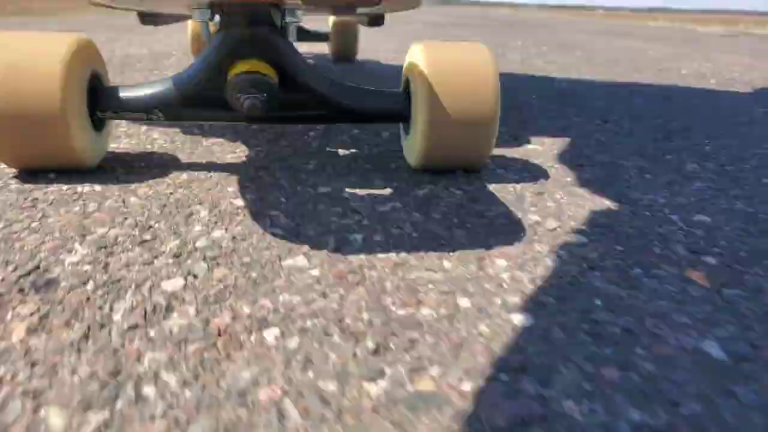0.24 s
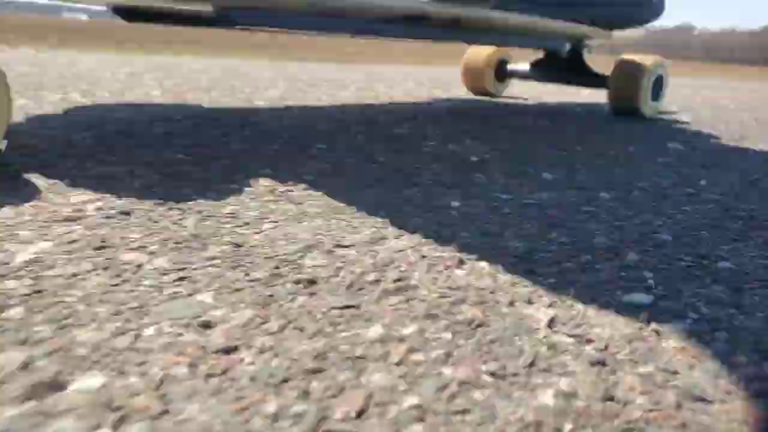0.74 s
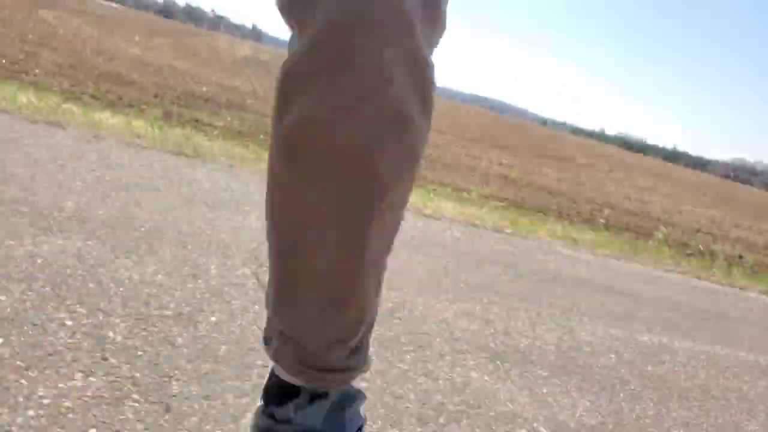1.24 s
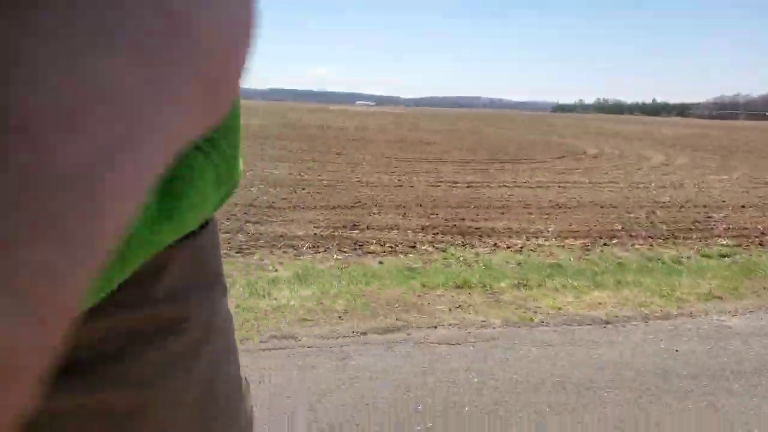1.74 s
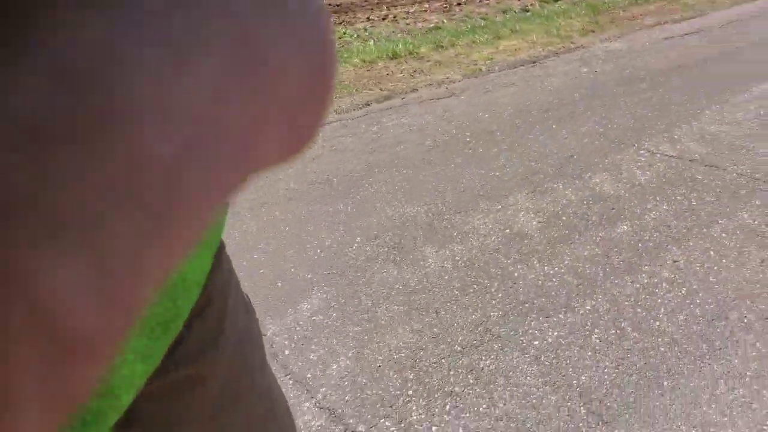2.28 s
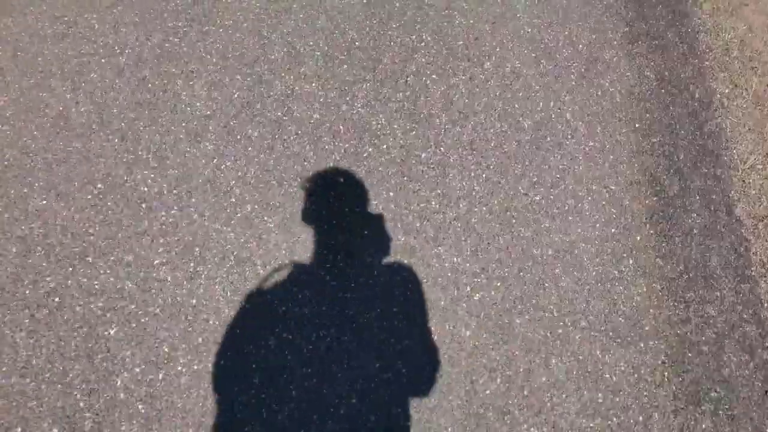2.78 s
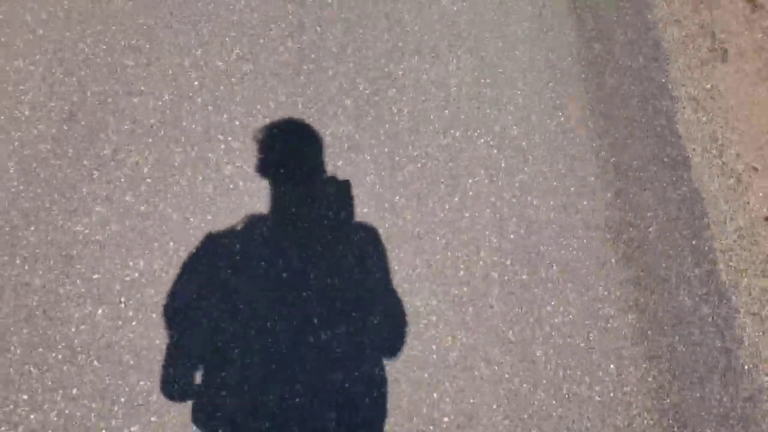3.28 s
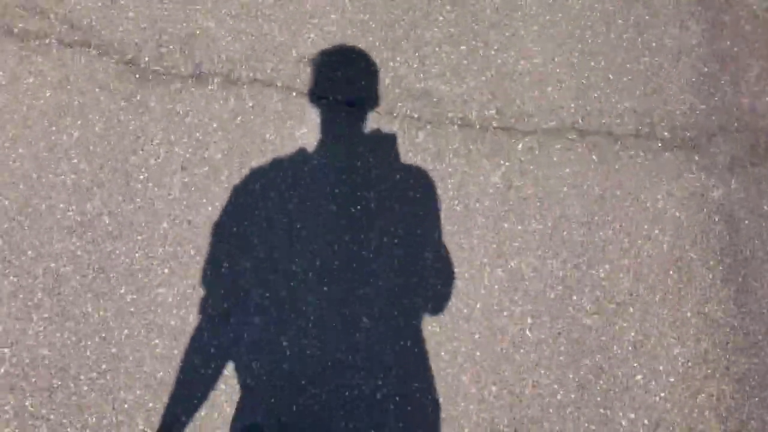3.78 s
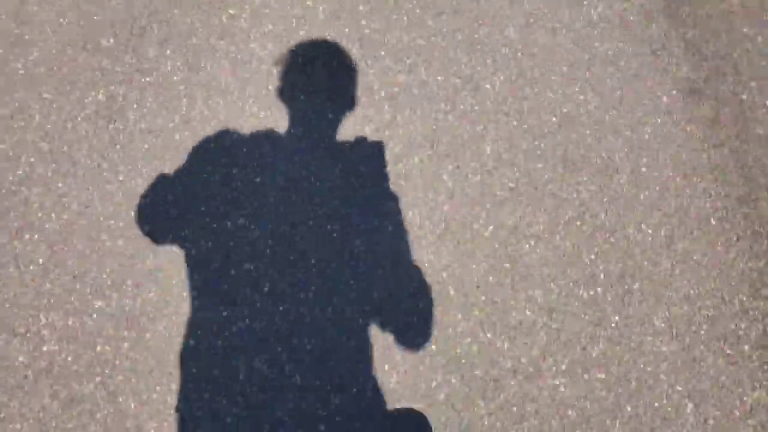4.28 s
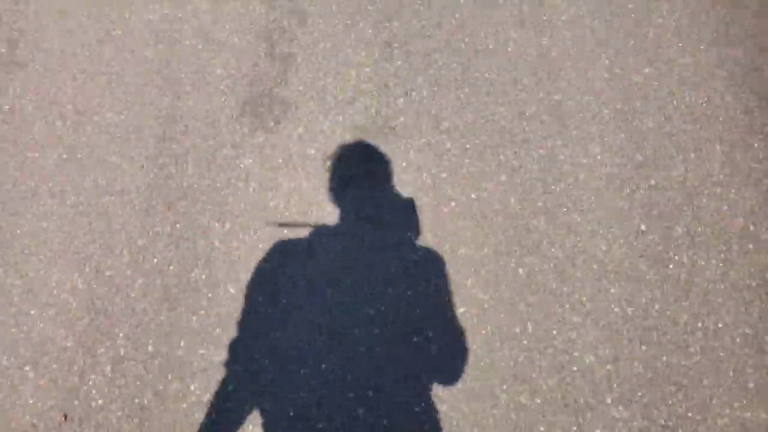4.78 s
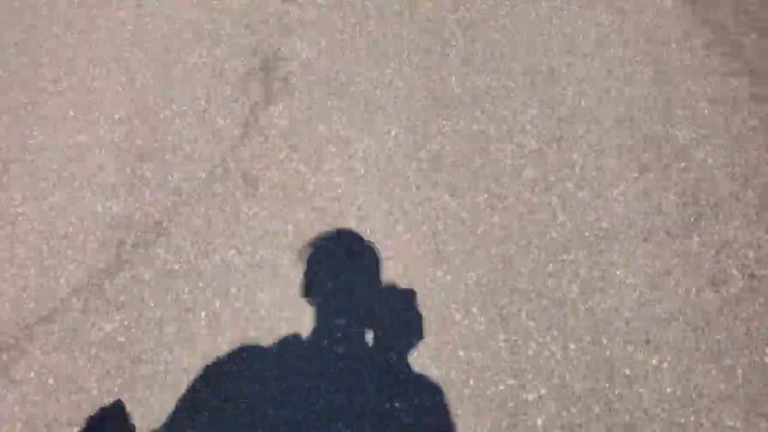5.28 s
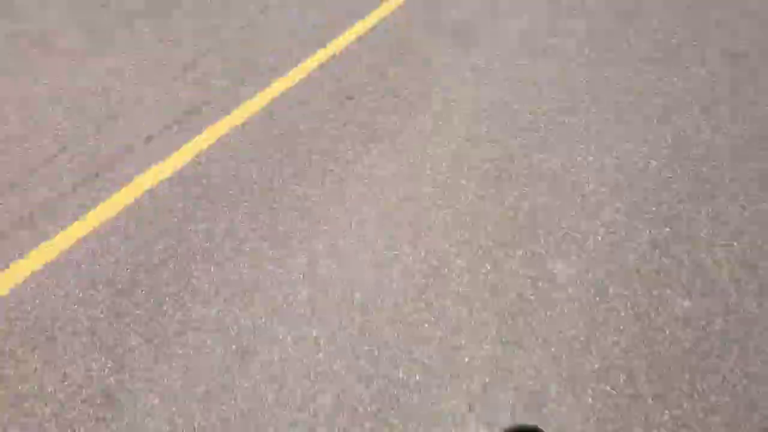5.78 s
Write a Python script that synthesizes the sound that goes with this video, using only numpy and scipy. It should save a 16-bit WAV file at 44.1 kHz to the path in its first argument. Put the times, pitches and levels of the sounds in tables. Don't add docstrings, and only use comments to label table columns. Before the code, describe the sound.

Outdoors, a phone close to a longboard's wheels picks up soft wheels on coarse asphalt: a low drone around 160-300 Hz, dense stone chatter ringing the wooden deck, and bright, flickering grit hiss. At about 0.2 s a knock, sharp ticks and a wind pop come together. The hiss stays close until about 1.1 s, then fades as the phone rises; rolling surges unevenly near 1.5 and 2.05 s. Wind buffets each side independently, with strong gusts and pops around 2.0-2.25 s and another gust at 2.5 s. Total silence from 2.72 to 2.79 s. Then a rougher, louder road in calmer wind: hollow deck knocks from 2.8 s, dense from 3.4 s, hardest around 4.15 and 4.45 s. A hard kick near 4.04 s and another at 5.24 s bring truck rattle and grit spray. A gust rises at 5.6 s, knocks hit near 5.7 s, and rolling continues to the abrupt end at 6 s.

```python
import sys
import numpy as np
from scipy import signal
from scipy.io import wavfile
from scipy.ndimage import uniform_filter1d

SR = 44100
rng = np.random.default_rng(int(sys.argv[2]) if len(sys.argv) > 2 else 0)


def pcm_store(signal):
    levels = np.round(np.clip(np.atleast_2d(signal), -1, 1) * 32767)
    wavfile.write(sys.argv[1], SR, levels.astype(np.int16).T)


def rack_gain(trim_db):
    fader = np.asarray(trim_db, float)
    return 10 ** (fader / 20)


N = 265910
TIME = np.arange(N) / SR
SILENCE_START_S, SILENCE_END_S = 2.7187, 2.7942
STONES_PER_S, STONE_SPREAD_DB = 700, 3.5


def evened(x):
    return x / np.sqrt(np.mean(x ** 2) + 1e-20)


def read(points, hz):
    f, value = np.transpose(points)
    return np.interp(np.log(hz + 1), np.log(f + 1), value)


def follow(shots, t):
    s, *columns = np.vstack(shots).T
    return [np.interp(t, s, c) for c in columns]


def by_shot(first, second, t):
    return np.where(t < SILENCE_END_S, first, second)


def humps(rows, t):
    return sum(db * np.exp(-((t - s) / length) ** 2) for s, length, db in rows)


def wander(shape, size):
    smooth = uniform_filter1d(rng.standard_normal(shape), size, axis=0)
    return evened(uniform_filter1d(smooth, size, axis=0))


def spread(mono, pan_db):
    return mono * rack_gain(np.array([pan_db / 2, -pan_db / 2]))


def ring(x, modes):
    out = np.zeros_like(x)
    for k, (hz, width, db) in enumerate(modes):
        r = np.exp(-np.pi * width / SR)
        turn = 2 * np.pi * hz / SR
        tone = signal.lfilter([1], [1, -2 * r * np.cos(turn), r * r], x)
        out += (-1) ** k * rack_gain(db) * (1 - r) * np.sin(turn) * tone
    return out


def stones(per_s, spread_db):
    size = rack_gain(spread_db * np.minimum(rng.exponential(1, N), 5)) * rng.choice([-1, 1], N)
    return evened(size * (rng.random(N) < per_s / SR))


# (time [s], strength [dB])
KICKS = [
    (.38, 3),
    (2.03, 5),
    (3.289, -0.5),
    (4.041, 16.5),
    (4.46, 2),
    (5.24, 11),
    (5.76, 4.5),
]


def pushes(t):
    rise_s, fall_s = 0.15, 0.2
    return sum(db * np.exp(-((t - s) / np.where(t < s, rise_s, fall_s)) ** 2) for s, db in KICKS)


# (time [s], nearness [dB])
NEARNESS = [
    [(0.0, 6), (0.18, 9.5), (0.35, 7), (0.58, 8), (0.66, 10), (1.05, 9.5), (1.45, 0), (1.6, -2.5),
     (2.3, -10.5), (2.5, -5.5), (2.71, -4)],
    [(2.8, 2), (3.1, 0.5), (3.8, 1), (4.5, 3), (4.95, -1), (5.6, 1.5), (6.03, 2)],
]


def nearness(t):
    return follow(NEARNESS, t)[0]


# (time [s], rolling level [dB], stance [dB])
RIDE = [
    [(0.1, -33, -9), (0.45, -38, -4.5), (0.7, -32, -14.5), (1.15, -44, -13.5), (1.5, -30, -31),
     (1.85, -38.5, -12), (2.05, -31.5, -15), (2.35, -44, -26), (2.6, -34.5, -6.5)],
    [(2.8, -28.5, -12.5), (3.5, -30.5, 0.5), (3.8, -30.5, -6), (4.45, -23.5, -3), (4.75, -27, -6),
     (5.0, -31.5, 0), (5.4, -27.5, -4.5), (5.75, -27.5, -4.5), (6.03, -26.5, -16)],
]
# (time [s], length [s], strength [dB])
DECK_FLEXES = [(.18, 0.075, 9.5), (.72, 0.31, 1.5), (1.03, 0.11, -4.5), (1.43, 0.027, 7.5),
               (2.17, 0.063, -12), (2.55, 0.032, -1), (2.86, 0.15, 4.5), (2.97, 0.031, -1.5),
               (3.8, 0.2, -6.5), (4.28, 0.12, 10), (4.44, 0.033, -3), (4.68, 0.038, 6), (5.42, 0.14, 5.5),
               (5.97, 0.054, 9)]


def state():
    roll, stance = follow(RIDE, TIME)
    return np.array([roll + 32, stance + 6, nearness(TIME), pushes(TIME), humps(DECK_FLEXES, TIME)])


# (frequency [Hz], width [Hz], level [dB])
WHEEL_MODES = [(161.6, 63, -10), (198, 43, -1.5), (255.3, 24.6, 0.5), (307.4, 42, -4.5)]
# (time [s], length [s], strength [dB])
BUSHING_JOLTS = [(.25, 0.045, 2.5), (.78, 0.051, 2), (1.03, .04, 13), (1.35, 0.086, -8), (1.55, 0.037, 4),
                 (2.54, 0.043, 6.5), (2.83, 0.029, 6), (3.2, 0.11, -5), (3.43, 0.031, 8.5),
                 (3.75, 0.056, 3.5), (3.93, 0.095, 6.5), (4.15, 0.11, -6.5), (4.42, 0.066, 7),
                 (4.9, 0.045, -2), (5.18, 0.14, 4), (5.37, 0.023, 0)]


def wheels(now):
    roll, stance, near, push, flex = now
    level_db = -38.5 + 0.41 * roll + 0.23 * stance + 0.36 * flex
    level_db += humps(BUSHING_JOLTS, TIME) + 3 * wander(N, size=3000)
    return rack_gain(level_db) * evened(ring(stones(STONES_PER_S, 3.4), WHEEL_MODES))


# (frequency [Hz], width [Hz], level [dB])
DECK_MODES = [
    [(393.5, 43, -6.5), (438, 27, 0.5), (495.7, 33, -5)],
    [(572.9, 35.8, 0.5), (624.4, 31, -0.5)],
    [(695.6, 27.5, -1), (752, 42, 2), (864.5, 89, -13)],
    [(1021, 207, 0.5), (1250, 204, 5), (1368, 186, 3), (1607, 186, -2), (2290, 510, -12)],
]
LIKENESS = [1, 0.98, .97, 0.9]
BLOW_SPREADS = [2.9, 3.87, 3.3, 2.05]
# (level [dB], then its share [dB per dB] of
ANSWERS = [
    (-34.5, 0.49, -0.17, 0.096, -0.15, 0.93),
    (-32.5, 0.96, -0.041, 0.03, 0.24, 0.035),
    (-41.5, 1, 1, 0.061, 0.81, 0.05),
    (-52.5, 0.68, 0.33, 0.49, 1, 0.083),
]


def deck(now):
    common, out = stones(STONES_PER_S, STONE_SPREAD_DB), np.zeros((2, N))
    bumps = rack_gain(1.6 * wander(N, size=500))
    tread = signal.windows.hann(24)
    for modes, same, spread_db, answer in zip(DECK_MODES, LIKENESS, BLOW_SPREADS, ANSWERS):
        share = 0.55 * spread_db / STONE_SPREAD_DB
        blows = share * common + np.sqrt(1 - share ** 2) * stones(STONES_PER_S, spread_db)
        apart = np.sqrt(1 - same) * stones(STONES_PER_S, STONE_SPREAD_DB)
        blows = np.array([np.sqrt(same) * blows + apart, np.sqrt(same) * blows - apart])
        sound = evened(ring(signal.oaconvolve(blows * bumps, tread[None])[:, :N], modes))
        level_db = answer[0] + np.dot(answer[1:], now) + 2 * wander(N, size=2000)
        out += sound * rack_gain(level_db)
    return out


def bending(board):
    hz, t, z = signal.stft(board, SR, nperseg=1024)
    streaks = evened(uniform_filter1d(wander((len(t), 80), size=5), size=2, axis=1)).T
    depth_db = np.where(hz[:80, None] < 900, 1.5, 3.5)
    z[:, :80] *= rack_gain(depth_db * streaks)
    return evened(signal.istft(z, SR, nperseg=1024)[1][:, :N]) * board.std()


# (time [s], level [dB])
WIND_LEVEL = [
    [(0.0, -36), (0.25, -35.5), (0.55, -42), (0.85, -39.5), (0.97, -37.5), (1.2, -45), (1.55, -38),
     (1.9, -39), (2.2, -29.5), (2.36, -40), (2.54, -30.5), (2.71, -39.5)],
    [(2.8, -44.5), (3.15, -44.5), (3.6, -43), (4.9, -45), (5.62, -36), (6.03, -47.5)],
]
# (frequency [Hz], level [dB per Hz])
WIND_COLOUR = [(12, -53), (20, 0), (70, 3.5), (111, -1.5), (177, 2), (226, -4.5), (440, -2), (620, -9),
               (686, -16.5), (1310, -34.5), (2500, -58), (3250, -88), (5500, -120)]


def wind():
    share = 0.7
    eddies = np.array([stones(350, 3.5) for port in "LR"])
    source = share * eddies + np.sqrt(1 - share ** 2) * rng.standard_normal((2, N))
    hz, t, z = signal.stft(source, SR, nperseg=1024, noverlap=768)
    lumps = 2.8 * np.tanh(wander((len(t), 2), size=3).T[:, None] / 2)
    above = np.log2(1 + hz / 300)[:, None]
    reach_db = 3 * np.minimum(above, 1.3)
    z *= rack_gain(read(WIND_COLOUR, hz)[:, None] + lumps * (1 + 0.18 * above) + reach_db)
    low = np.sum(abs(z[:, :4]) ** 2) / np.sum(abs(z) ** 2)
    noise = evened(signal.istft(z, nperseg=1024, noverlap=768)[1][:, :N])
    level_db, = follow(WIND_LEVEL, TIME)
    return rack_gain(level_db + 2.5) / np.sqrt(low) * noise


# (frequency [Hz], level [dB per Hz])
GRIT_COLOUR = [(1200, 2), (2200, 3.5), (3000, -1.5), (5500, -1), (8500, -0.6), (10800, 0.5), (14600, 3)]
# (frequency [Hz], width [Hz], left [dB], right [dB])
PORT_MODES = [(3750, 1100, 3.5, 5), (7290, 1150, 6, 4.5), (9400, 670, 2, 1.5), (12000, 1050, 8.5, 8.5)]
# (time [s], length [s], strength [dB])
SAND_PATCHES = [(.2, 0.0092, 4), (1.18, 0.018, -2.5), (1.22, 0.014, 1.5), (1.45, 0.071, 4.5),
                (5.38, 0.096, 1.5), (1.93, 0.045, 8), (2.08, 0.037, 3), (2.46, 0.03, 3), (2.55, 0.025, 3.5),
                (2.88, 0.012, 1.5), (3.47, 0.0088, -4), (3.87, 0.01, 2.5), (3.94, 0.036, 2.5),
                (4.13, 0.041, -2.5)]


def hiss():
    frames, hz = N // 64 + 5, np.fft.rfftfreq(256, 1 / SR)
    t = np.arange(frames) * 64 / SR
    bright = by_shot(-1, -3, t) + 0.042 * nearness(t)
    real, imaginary = rng.standard_normal((2, 2, frames, 129))
    flicker = 1.44 * wander(frames, size=3) + 0.38 * wander(frames, size=14)
    patches = 1.57 * evened(uniform_filter1d(wander((frames, 129), size=20), size=5, axis=1))
    field = read(GRIT_COLOUR, hz) + flicker[:, None] + patches
    field += bright[:, None] * np.log2((hz + 500) / 8000)
    ports = sum(np.outer(db, 1 / (1 + (2 * (hz - f) / width) ** 2)) for f, width, *db in PORT_MODES)
    side_db = np.outer(by_shot(2.5, 1.1, t), (hz / 10000) ** 2)
    z = (real + 1j * imaginary) * spread(rack_gain(field + ports[:, None]), side_db)
    noise = evened(signal.istft(z.transpose(0, 2, 1), nperseg=256, noverlap=192)[1][:, :N])
    kicked_db = 0.42 * pushes(TIME - 0.097)
    return rack_gain(-48 + nearness(TIME) + kicked_db + humps(SAND_PATCHES, TIME)) * noise


# (time [s], peak level [dB], pitch [Hz], left-right [dB], ring [ms])
GRIT_TICKS = [(.1675, -40, 12200, 3, .4), (0.1987, -21, 9500, 8, 0.36), (0.1986, -27, 6640, 3, 0.37),
              (0.2, -40, 11500, 3, .5), (.2300, -31, 10100, 1, .4), (.2407, -33, 11400, 7, .5),
              (.643, -34, 11900, 6, 0.56), (1.122, -30, 12300, 6, .5), (1.193, -30, 11900, 9, .5),
              (1.268, -35, 11900, 8, 0.43), (1.698, -39, 11800, 3, .5), (1.857, -43, 5600, 10, 0.18),
              (2.079, -57, 9400, -2, 0.35), (4.004, -35, 2060, 18, 0.55), (5.19, -21, 2300, 6, 0.76),
              (5.1901, -22, 1600, 5, 0.64)]


def ticks():
    out, t = np.zeros((2, N + 600)), np.arange(600) / SR
    for s, db, hz, pan_db, ring_ms in GRIT_TICKS:
        shape = t * np.exp(-1000 * t / np.clip(ring_ms, .2, 3))
        chip = [(hz, 0.24 * hz, 0)]
        puff = evened(ring(ring(rng.standard_normal(600), chip), chip))
        snap = (np.sin(2 * np.pi * hz * t) + 0.46 * puff) * shape
        start = round(s * SR)
        out[:, start:start + 600] += spread(rack_gain(db) * snap / abs(snap).max(), np.array([pan_db]))
    return out[:, :N]


# (time [s], peak level [dB], rattle against it [dB])
CRACKS = [(0.205, -14, -17), (0.277, -25, -14), (2.821, -18, -29), (3.108, -18.5, -35.5), (3.413, -12, -35),
          (3.551, -9, -25.5), (3.733, -9, -34), (3.872, -8.5, -29), (3.948, -12, -23), (3.993, -9, -17),
          (4.026, -30, -19), (4.041, -8, -19), (4.064, -19.5, 0), (4.155, -2.5, -20), (4.205, -12, -18),
          (4.424, -5, -24.5), (4.453, -0.5, -24), (4.606, -28, -31), (4.632, -7, -29), (4.768, -12, -27),
          (4.854, -12, -44), (4.986, -15.5, -23), (5.036, -7.5, -24), (5.226, -6, -20),
          (5.249, -9.5, -12.5), (5.695, -11, -28), (5.741, -7, -44)]


def knocks():
    blows = np.zeros((2, N))
    for s, db, rattle_db in CRACKS:
        blows[:, round(s * SR)] = rack_gain([db - 7.5, db + rattle_db + 2.5])
    pulse = np.pad(signal.windows.hann(24), (0, 6000))
    body = ring(pulse, DECK_MODES[0] + DECK_MODES[1] + DECK_MODES[2])
    rattle = ring(pulse, DECK_MODES[3])
    return sum(signal.oaconvolve(b, r / abs(r).max())[:N] for b, r in zip(blows, (body, rattle)))


# (time [s],
# peak level [dB], left-right [dB])
BURSTS = [(.221, -12, 4), (0.282, -17.5, 13), (1.922, -36, -7), (1.999, -14.5, 15), (2.0273, -10, 12),
          (2.103, -42, 5), (2.182, -22, 1), (2.2073, -32, -9), (2.2125, -26, 8), (2.2205, -16.5, 1),
          (2.2545, -14, -9), (2.381, -26, -5), (2.7185, -28, 12.5), (5.2504, -17, -4)]


def pops():
    hits = np.zeros((2, N))
    for s, db, pan_db in BURSTS:
        hits[:, round(s * SR)] = spread(rack_gain(db), pan_db)
    u = np.arange(-200, 201) / SR / 0.00074
    return signal.oaconvolve(hits, ((1 - u ** 2) / (1 + u ** 2) ** 2)[None], "same")


# (frequency [Hz], readiness [spreads of chance])
READINESS = [(1000, -4), (1700, -2.6), (2400, -1.9), (3100, -1.3), (4900, -1.3), (6200, -1.5), (7300, -3),
             (9500, -2.4)]
# (time [s], length [s], extra readiness [spreads of chance])
DROP_SPELLS = [(.05, .06, 1.3), (.25, .05, 1.3), (.46, .04, 1.3), (1.72, .13, 2.4), (2.02, .04, 1.5),
               (3.3, .35, 1.2)]


def starve(x):
    hz, t, z = signal.stft(x, SR, nperseg=1024)
    power = (abs(z[:, :512]) ** 2).reshape(2, 128, 4, -1).mean(axis=(0, 2))
    bands_db, band_hz = 10 * np.log10(power + 1e-14), hz[2:512:4, None]
    treble_over_bass = bands_db[16:80].mean(axis=0) - bands_db[1:5].mean(axis=0)
    hunger = .025 * (-24 - uniform_filter1d(treble_over_bass, size=20))
    valley = .12 * (uniform_filter1d(bands_db, size=15, axis=0) - uniform_filter1d(bands_db, size=5, axis=1))
    fine = wander(bands_db.T.shape, size=3).T
    clump = evened(uniform_filter1d(wander(bands_db.T.shape, size=6).T, size=4, axis=0))
    off_centre = 6 * np.log(band_hz / by_shot(3500, 4700, t))
    lean = humps(DROP_SPELLS, t) * np.exp(-off_centre ** 2)
    keep = .8 * fine + .6 * clump + read(READINESS, band_hz) + hunger + valley + lean < 0
    jump_db = bands_db - uniform_filter1d(bands_db, size=9, axis=1)
    keep |= uniform_filter1d(jump_db, size=9, axis=0) > 3
    z[:, :512] *= np.repeat(keep, 4, axis=0)
    return signal.istft(z, SR, nperseg=1024)[1][:, :N]


def scene():
    now = state()
    board = bending(deck(now))
    return wheels(now) + board + wind() + hiss() + ticks() + knocks() + pops()


def low_pass(x):
    return signal.sosfilt(signal.butter(12, 14970, fs=SR, output="sos"), x)


def record(dry):
    x = signal.sosfilt(signal.butter(N=2, Wn=35, btype="high", fs=SR, output="sos"), dry)
    lowpass = signal.firwin(401, 14550, window=("kaiser", 9), fs=SR)
    x = starve(signal.oaconvolve(x, lowpass[None], "same"))
    outside_s = np.maximum(SILENCE_START_S - TIME, TIME - SILENCE_END_S)
    return low_pass(x * np.clip(outside_s * SR, 0, 1))


dry = scene()
out = record(dry)
pcm_store(out)
```